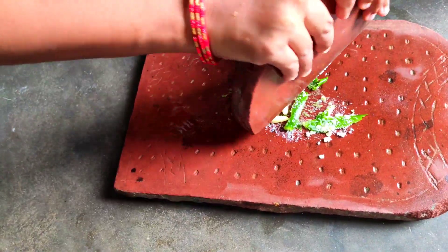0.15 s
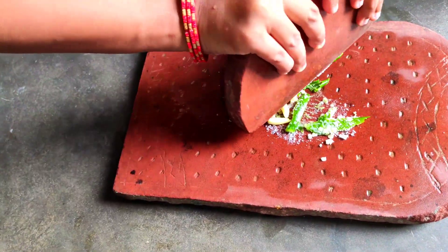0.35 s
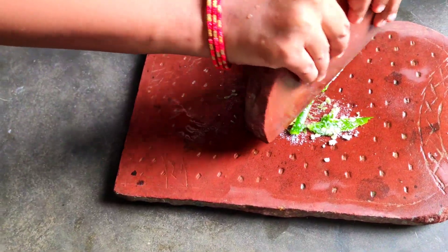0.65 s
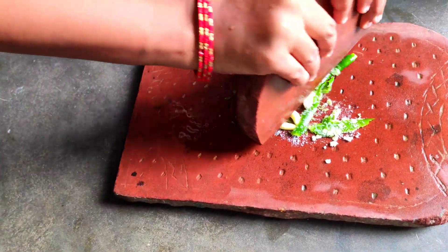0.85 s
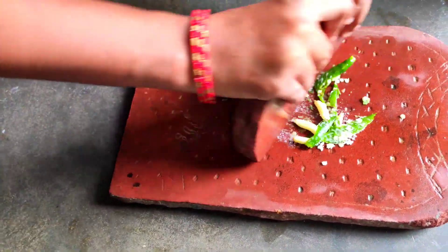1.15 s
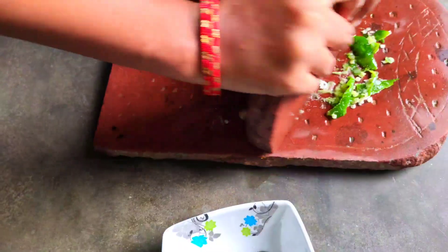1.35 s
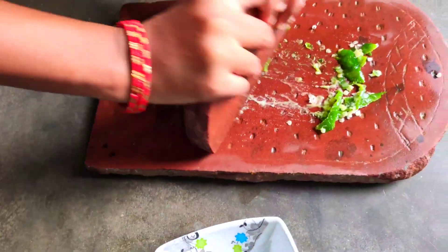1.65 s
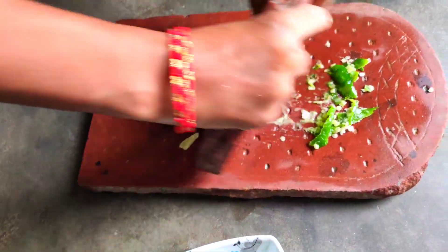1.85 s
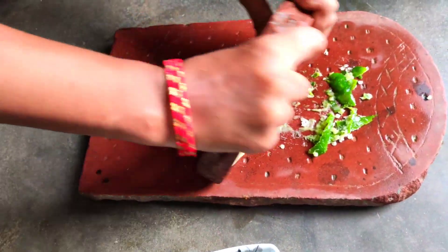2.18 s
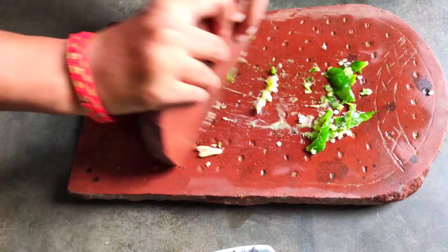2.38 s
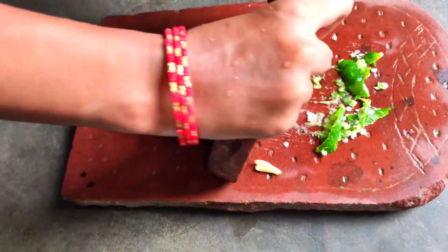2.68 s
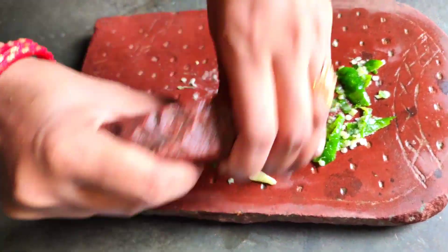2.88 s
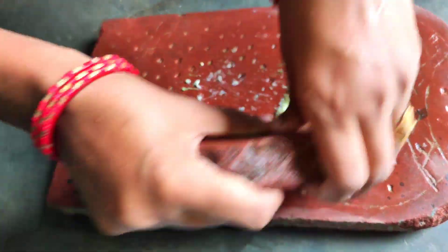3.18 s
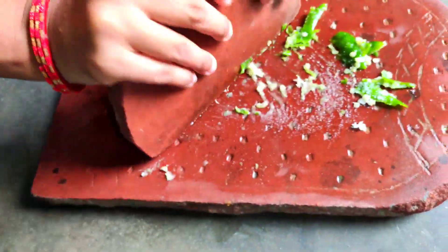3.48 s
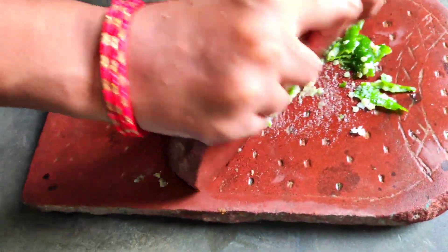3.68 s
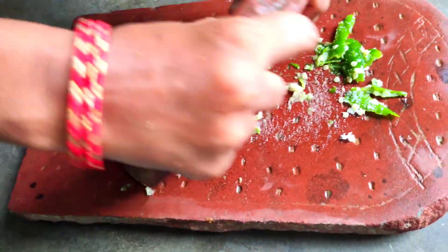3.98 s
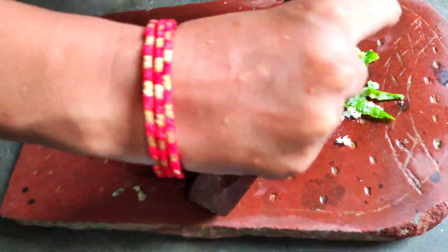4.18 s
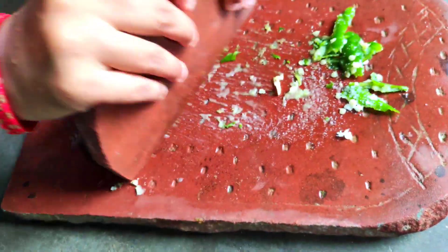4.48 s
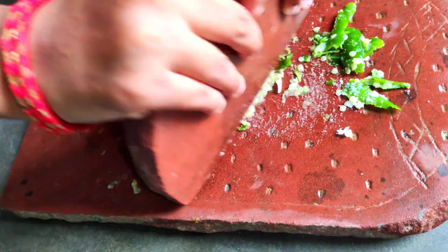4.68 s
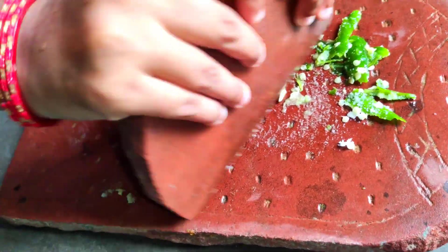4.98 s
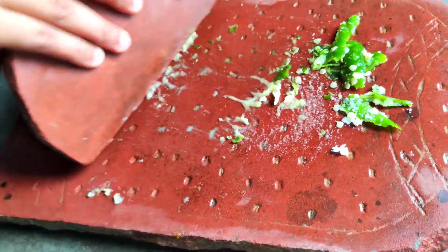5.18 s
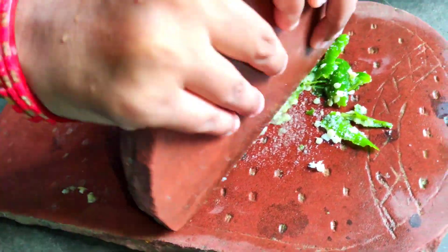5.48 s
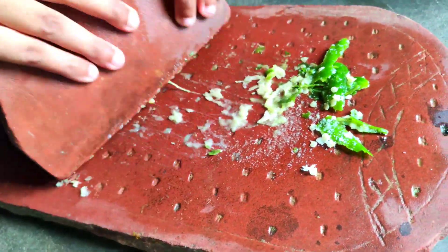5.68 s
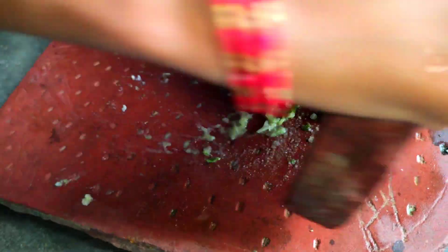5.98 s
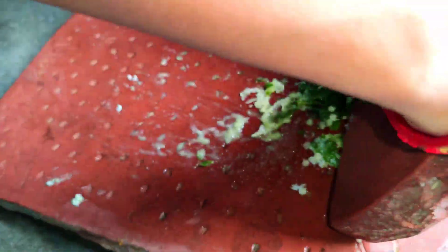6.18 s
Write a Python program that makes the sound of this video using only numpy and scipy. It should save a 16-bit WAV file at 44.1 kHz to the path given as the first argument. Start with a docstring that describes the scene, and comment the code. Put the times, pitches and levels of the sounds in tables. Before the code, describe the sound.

In a quiet, hard-walled kitchen, chillies crackle and crunch under a first gentle press. Then a stone muller rasps over a pitted slab in short, uneven strokes, with fine grit sizzling and salt hissing. Loud stone knocks break in as it lands. Later a thin bangle tinkles now and then and a faint whistle glides far away. The microphone is very close, and the hardest blows distort.

```python
"""Quiet kitchen air is joined by chillies crackling under a first press, then crunching, most often at first.
A stone muller scrapes a slab: grits excite the modes of both stones, fine grit sizzles and salt hisses.
From early on, landings knock both stones, each a sum of decaying modes and short noise bursts.
Later a bangle tinkles now and then, its high modes set off by chatter, and a faint far whistle glides.
Hard walls reverberate the work; a close phone clips whatever exceeds full scale and cuts the top."""
import sys
import numpy as np
from scipy import signal
from scipy.fft import rfft, irfft
from scipy.io import wavfile
from scipy.ndimage import uniform_filter1d

SR = 44100
rng = np.random.default_rng(int(sys.argv[2]) if len(sys.argv) > 2 else 0)


def materialize(psi):
    """Save the field psi as 16-bit PCM at rate SR to the path in sys.argv[1].

    A 1-D psi becomes a single channel; in a 2-D psi each row is a channel.
    """
    bounded = np.clip(np.atleast_2d(psi).T, -1, 1)
    quanta = np.round(bounded * 32767).astype(np.int16)
    wavfile.write(sys.argv[1], SR, quanta)


N = 279594
TIME = np.arange(N) / SR


def undb(db):
    """Logarithmic level: decibels become an amplitude gain."""
    return 10 ** (np.asarray(db) / 20)


def unit(x):
    """Power normalisation: scale to rms 1."""
    return x / np.sqrt(np.mean(x ** 2))


def unit_onset(x):
    """Onset normalisation: scale to rms 1 over the first hundredth of a second."""
    return x / np.sqrt(np.mean(x[:, :SR // 100] ** 2))


def sides(pan_db):
    """Interaural level difference: left and right gains, given left minus right in dB."""
    return undb(np.array([[.5], [-.5]]) * pan_db)


def add(out, start_s, sound):
    """Superposition: mix a stereo sound in at its start time."""
    start = int(start_s * SR)
    out[:, start:start + sound.shape[1]] += sound[:, :N - start]


def convolve(x, response):
    """Linear time-invariant system: pass a sound through an impulse response."""
    return signal.oaconvolve(x, np.atleast_2d(response), axes=1)[:, :x.shape[1]]


def colour(x, points, size=2048):
    """Minimum-phase filtering: a (Hz, dB) outline whose peaks ring after each click."""
    hz, db = np.transpose(points)
    bins_hz = np.arange(size // 2 + 1) * SR / size
    outline_db = np.interp(np.log(bins_hz + 1), np.log(hz), db)
    # folding the cepstrum onto positive times makes the filter causal
    cepstrum = irfft(np.log(undb(outline_db)))
    cepstrum[1:size // 2] *= 2
    cepstrum[size // 2 + 1:] = 0
    return convolve(x, irfft(np.exp(rfft(cepstrum))))


def ring(modes, t, detune=0.):
    """Modal superposition: decaying sines of alternating sign, each randomly shifted by a small ratio."""
    t = np.maximum(t, 0)
    shifts = 1 + detune * rng.standard_normal(len(modes))
    total = 0
    for k, (hz, db, t60) in enumerate(modes):
        decay = undb(db - 60 * t / t60)
        total = total + (-1) ** k * decay * np.sin(2 * np.pi * hz * shifts[k] * t)
    return total


def grits(per_s, spread_db, shared, lag_samples=3):
    """Shot noise: random catches, mostly small; a share is common to both sides, later on the left."""
    shape = (3, N)
    sizes = undb(spread_db * np.minimum(rng.exponential(size=shape), 4))
    catches = rng.random(shape) < per_s / SR
    both, left, right = catches * sizes * rng.choice([-1, 1], shape)
    common = np.array([np.roll(both, lag_samples), both])
    return np.sqrt(shared) * common + np.sqrt(1 - shared) * np.array([left, right])


def burst(points, decay_s, channels=2, rise_s=0.0019):
    """Transient noise: a coloured puff that swells and dies at once, of unit onset."""
    t = np.arange(SR // 10) / SR
    shape = (1 - np.exp(-t / rise_s)) * np.exp(-t / decay_s)
    return unit_onset(colour(rng.standard_normal((channels, len(t))) * shape, points))


def arch(start_s, rise_s, fall_s):
    """Harmonic motion from rest to rest: a quarter sine up to 1 and another down to 0."""
    turn = np.interp(TIME, [start_s, start_s + rise_s, start_s + rise_s + fall_s], [0, 1, 0])
    return np.sin(np.pi / 2 * turn)


def nearness(hz, centre_hz, octaves=0.46):
    """Selective excitation: 1 for a mode at the centre, falling to 0 away from it."""
    return np.exp(-(np.log2(hz / centre_hz) / octaves) ** 2)


# outline of the quiet air: (frequency [Hz], relative level [dB])
AIR = [(20, 2), (60, 3), (120, -4.5), (300, -0.5), (900, -4), (2000, -4), (4000, -9), (7000, -16),
       (13000, -20), (16000, -31)]


def air(level_db=-60.5):
    """Spatial coherence: background noise of the room, alike on both sides in the bass."""
    mid, side = rng.standard_normal((2, 1, N))
    side = colour(side, [(100, -17), (600, -5.0), (1500, 0.0)])
    return undb(level_db) * unit(colour(mid + np.array([[1], [-1]]) * side, AIR))


# first press on the chillies: (start [s], building [s], fading [s])
PRESS = (0.038, 0.25, 0.4)
# cracking chillies and salt crystals: (time [s], onset level before panning [dB])
CRUNCH_EVENTS = [(0.0921, -33), (0.1531, -52), (0.1648, -48), (0.1822, -45), (0.205, -45), (0.2316, -46),
                 (0.2579, -37), (0.3648, -49), (0.413, -48), (0.5142, -50.5), (0.9837, -40), (1.242, -37),
                 (2.4548, -40), (5.2719, -36.5), (5.875, -52.5)]
# outline of one crack: (frequency [Hz], relative level [dB])
CRUNCH_COLOUR = [(500, -21.5), (2500, -11), (4200, -2), (5300, 9), (6500, -0.5), (8000, -13),
                 (15000, -23.5)]


def crunches(pan_db=4, crackle_per_s=140, crackle_db=-53.5):
    """Brittle fracture: quickly dying noise bursts; small ones crackle under the first press."""
    crackle = unit(colour(grits(crackle_per_s, 2.5, 0.78), CRUNCH_COLOUR))
    out = undb(crackle_db) * arch(*PRESS) * crackle
    for start_s, db in CRUNCH_EVENTS:
        add(out, start_s, undb(db) * burst(CRUNCH_COLOUR, 0.0031, rise_s=0.00039))
    return sides(pan_db) * out


# reverberation of the kitchen: (frequency [Hz], decay by 60 dB [s])
ROOM_T60 = [(150, .5), (400, 0.45), (1000, 0.336), (2800, 0.3), (7000, 0.2237), (14000, 0.2)]
# its standing waves: (frequency [Hz], relative level [dB], decay by 60 dB [s])
ROOM_MODES = [(150, -3.5, 0.69), (184, -1, 0.7), (269.3, 2, 0.3), (342.9, -1.7, 0.7)]


def kitchen(x, wet_db=-6.0, early_db=-12, early_s=0.0045, standing_db=-56):
    """Reverberation: hard walls give clustered first echoes, a diffuse tail and low standing waves."""
    t = np.arange(SR // 2) / SR
    hz, t60 = np.transpose(ROOM_T60)
    bins_hz = np.arange(len(t) // 2 + 1) * SR / len(t) + 1
    mid, side = rfft(rng.standard_normal((2, len(t))))
    alike = np.sinc(bins_hz / 1500)  # the two microphones hear long waves alike
    field = np.sqrt((1 + alike) / 2) * mid + np.array([[1], [-1]]) * np.sqrt((1 - alike) / 2) * side
    # overlapping bands of noise, each with its own decay
    tail = 0
    for band, decay_s in zip(np.eye(len(hz)), t60):
        weight = np.interp(np.log(bins_hz), np.log(hz), band)
        tail = tail + irfft(field * weight, len(t)) * undb(-60 * t / decay_s)
    diffuse = undb(wet_db) * np.clip(t / 0.0025, 0, 1) / np.sqrt(0.034 * SR)
    cluster = (t > early_s) * np.exp(-np.abs(t - early_s) / 0.0033)
    early = undb(early_db) * cluster / np.sqrt(0.06 * SR)
    walls = colour(tail * (diffuse + early), [(300, 3.0), (4000, 2), (7000, 1), (14000, -7.5)])
    return convolve(x, walls + undb(standing_db) * ring(ROOM_MODES, t))


# strokes of the muller, nominal levels at full speed: (start [s], speeding up [s], slowing down [s],
# slab rumble [dB], rumble centre [Hz], muller rasp [dB], grit sizzle [dB], salt hiss [dB])
STROKES = [(0.093, 0.0083, 0.16, -54, 543, -63, -55, -63), (0.2, 0.072, 0.085, -56.5, 910, -54, -50, -48),
           (0.31, 0.062, 0.32, -63, 803, -68.5, -67, -59.5),
           (0.65, 0.071, 0.037, -54.5, 920, -52.5, -40.5, -51.5),
           (0.816, 0.045, 0.14, -30, 1250, -37, -37.5, -42.5), (0.96, .09, .06, -65, 880, -65, -57, -58),
           (1.055, 0.076, 0.078, -32, 880, -32.5, -37, -47.5),
           (1.224, 0.035, 0.14, -32, 890, -36, -37.5, -47),
           (1.383, 0.1, 0.098, -39, 740, -42.5, -44.5, -53.5),
           (1.59, 0.074, 0.11, -32.5, 970, -37.5, -38, -51.5),
           (2.0, 0.12, 0.086, -28.5, 1040, -35.5, -35, -47),
           (2.261, 0.095, 0.085, -36.5, 795, -40, -39.5, -47.5),
           (2.435, 0.09, 0.098, -32, 847, -35.5, -37.5, -48),
           (3.09, 0.082, 0.14, -37, 900, -41, -47, -54.5), (3.15, 0.14, 0.35, -51.5, 700, -55, -48, -54),
           (3.453, .1, 0.08, -33, 910, -37.5, -39, -47.5), (3.655, 0.076, .1, -36.5, 790, -37, -38.5, -48),
           (3.843, 0.034, 0.075, -31, 830, -39, -43.5, -54),
           (3.92, 0.063, 0.033, -40.5, 855, -41, -46.5, -59),
           (4.17, .095, 0.13, -37, 740, -37.5, -40.5, -51.5),
           (4.41, 0.11, 0.1, -33.5, 950, -35, -39.5, -51.5),
           (4.63, 0.085, 0.11, -42, 780, -41.5, -44, -52.5),
           (4.828, 0.065, 0.12, -36.5, 980, -38.5, -41, -48.5), (4.96, .04, 0.065, -75, 700, -62, -60, -76),
           (5.22, 0.11, 0.11, -33.5, 870, -34, -38, -47), (5.39, 0.16, 0.043, -64, 706, -57, -52, -54.5),
           (5.496, 0.07, 0.088, -42.5, 756, -42, -41, -49.5),
           (5.666, 0.042, 0.086, -32.5, 1060, -35.5, -37.5, -49),
           (5.75, 0.033, 0.07, -73, 810, -61, -60, -63), (6.17, 0.13, 0.056, -36, 690, -37.5, -41.5, -53)]
# powers of the speed by which layers grow and fade: (rumble [1], rasp [1], sizzle [1], hiss [1])
RISE_POWERS = (1.3, 1.399, 1.5, 1.6)
FALL_POWERS = (2.4, 1.8, 2.77, 2.07)
# the hand bears down early, the salt is swept along later: delays (rumble [s], rasp [s], sizzle [s], hiss [s])
LAYER_DELAYS_S = (.002, .003, .004, .006)


def stroke_controls():
    """Velocity-dependent friction: layer gains are powers of speed; the rumble centre glides by stroke."""
    gains = np.zeros((len(RISE_POWERS), N))
    for start_s, rise_s, fall_s, rumble_db, _, rasp_db, sizzle_db, hiss_db in STROKES:
        speed = arch(start_s, rise_s, fall_s)
        moving = np.flatnonzero(speed)
        rising = TIME[moving] < start_s + rise_s
        levels_db = (rumble_db, rasp_db, sizzle_db, hiss_db)
        for gain, db, up, down in zip(gains, levels_db, RISE_POWERS, FALL_POWERS):
            stroke_gain = undb(db) * speed[moving] ** np.where(rising, up, down)
            gain[moving] = np.hypot(gain[moving], stroke_gain)  # overlapping strokes add in power
    delayed = [np.interp(TIME - delay_s, TIME, gain) for gain, delay_s in zip(gains, LAYER_DELAYS_S)]
    start_s, rise_s, _, _, centre_hz, *_ = np.transpose(STROKES)
    return delayed, np.interp(TIME, start_s + rise_s, centre_hz)


def sway(x, modes, steady_db, sway_db=8.5, rate_hz=12, sharpness=9):
    """Moving contact: each resonance is driven now more, now less, around its curve in steady_db."""
    out = x
    knots_s = np.arange(0, N / SR + 1, 1 / rate_hz)
    for (hz, _, _), steady in zip(modes, steady_db):
        band = signal.lfilter(*signal.iirpeak(hz, sharpness, fs=SR), x)
        wander_db = sway_db * rng.standard_normal(len(knots_s)).clip(-2, 1.5)
        db = wander_db + np.interp(knots_s, TIME, steady + np.zeros(N))
        out = out + (np.interp(TIME, knots_s, undb(db)) - 1) * band
    # the colour shifts while the strength stays
    return out / np.sqrt(uniform_filter1d(np.mean(out ** 2, axis=0), SR // 16) + 1e-12)


def slips(per_s=55, lift=0.71, slip_s=.004):
    """Stick-slip: the gain jumps as the muller snags on pits and jumps free, then decays; rms 1."""
    snags = (rng.random(N) < per_s / SR) * rng.uniform(0.85, 0.89, N)
    return unit(1 + lift * signal.lfilter([1], [1, -np.exp(-1 / (slip_s * SR))], snags))


# modes of slab, muller and their stiff contact: (frequency [Hz], relative level [dB], decay by 60 dB [s])
SLAB = [(331.5, -15, 0.019), (505, -6, 0.017), (682, -3.5, 0.025), (863, -1.5, 0.019), (956, -1.5, 0.024),
        (1120, -0.5, 0.011), (1292, -6.5, 0.009), (1230, -5.5, 0.0026)]
MULLER = [(1380, -2.5, 0.0092), (1784.6, -2.5, 0.023), (1927, 0.5, 0.011), (2113, -8.5, 0.022)]
CLACK = [(2454, 0, 0.024), (2624, 0, 0.016), (2830, -2.5, 0.029), (3390, -20.5, 0.029)]
# outlines of coarse rumble, rasp, fine-grit sizzle and salt hiss: (frequency [Hz], relative level [dB])
RUMBLE = [(50, -53), (150, -23.5), (280, -16.5), (400, -9), (580, -2.5), (740, -6), (920, -10), (1110, -3),
          (1320, -10.5), (1550, -11.5), (2000, -15.5), (3500, -52.5)]
RASP = [(900, -23), (1550, -12), (1870, 2.5), (2230, -2), (2680, 4), (3000, -2), (3400, -3.5),
        (4500, -46.5)]
SIZZLE = [(2400, -29), (3400, 0.5), (4050, 5.5), (4700, -1.5), (5500, 1.5), (6300, -1.5), (7400, -38),
          (10000, -47)]
HISS = [(4000, -41.5), (6500, 6), (7700, -1.5), (9400, -1.5), (11000, -9), (13000, -12), (16000, -21)]
# where the muller rubs: (time [s], left minus right [dB])
PLACE = [(0, 8), (1.1, 6.5), (2.6, 5), (3.4, 2.5), (4.4, 2), (5.3, 2), (5.7, 2.5), (6.3, 1)]
# tilt of the muller on its edge: (time [s], drive of the contact modes over the muller modes in the rasp [dB])
EDGE = [(0.1, -3), (0.9, 12), (1.3, 3.5), (2.1, 1.5), (3.6, -5.5), (4.5, -3), (5.3, -3), (6.3, 3)]


def scraping(focus_db=11, focus_db_per_octave=9, rumble_pan_db=-0.2, sizzle_further_db=2, hiss_pan_db=-2):
    """Friction-driven resonance: grits shake both stones; the hand's judder modulates all together."""
    (rumble_gain, rasp_gain, sizzle_gain, hiss_gain), centre_hz = stroke_controls()
    place = sides(np.interp(TIME, *np.transpose(PLACE)))
    judder_filter = signal.butter(2, 110, fs=SR, output="sos")
    judder = unit(signal.sosfilt(judder_filter, rng.standard_normal(N)))
    # slab modes nearest the rumble's centre are driven hardest, the more so the higher it lies
    focus = focus_db + focus_db_per_octave * np.log2(centre_hz / np.mean(centre_hz))
    near_centre_db = [focus * nearness(hz, centre_hz) - 3.5 for hz, _, _ in SLAB]
    edge_db = np.interp(TIME, *np.transpose(EDGE))
    leaning_db = [-edge_db / 2] * len(MULLER) + [edge_db / 2] * len(CLACK)
    coarse = colour(grits(1000, 2.3, 0.85), RUMBLE)
    rumble = sway(coarse, SLAB, near_centre_db, sway_db=5.5) * rumble_gain
    rasp = sway(colour(grits(1800, 1.8, 0.11), RASP), MULLER + CLACK, leaning_db) * rasp_gain
    sizzle = unit(colour(grits(2500, 1.9, 0.61), SIZZLE)) * sizzle_gain
    hiss = unit(colour(grits(2300, 1.7, 0.076), HISS)) * hiss_gain
    # rasp follows the muller's place, sizzle lies further left
    rub = sides(rumble_pan_db) * rumble + sides(hiss_pan_db) * hiss
    rub = rub + place * (rasp + sides(sizzle_further_db) * sizzle)
    return undb(0.77 * judder) * slips() * rub


def knock(modes, rise_s, right_lead_s, rattle=.5):
    """Impact excitation: modes swell as rough faces seat in many tiny contacts; unit onset."""
    t = np.arange(SR // 10) / SR
    swell = 1 - np.exp(-(t / rise_s) ** 2)
    clean = ring(modes, t + np.array([[0], [right_lead_s]]), detune=0.0067) * swell
    contacts = rng.standard_normal((2, len(t))) * np.exp(-t / 0.001)
    return unit_onset(unit(clean) + rattle * unit(convolve(clean, contacts)))


# landings and catches of the muller, onset levels before panning: (time [s], floor thump [dB],
# slab thud [dB], thud centre [Hz], muller note [dB], clack [dB], spit of grit [dB], left minus right [dB])
KNOCKS = [(0.121, -59.5, -52, 490, -68, -66, -64, 1), (0.298, -62, -39.5, 1010, -57, -62, -67, 1),
          (0.7, -45, -15.5, 1090, -18.5, -20.5, -31.5, 3.5), (0.843, -79, -31, 1140, -46, -42, -47, 1),
          (1.0736, -49.5, -24.5, 900, -35, -31.5, -39.5, -2.5),
          (1.243, -72, -55, 1000, -51, -31.5, -43, -2), (1.6378, -59.5, -33, 1160, -59, -47, -48.5, 9),
          (1.929, -47, -16.5, 1120, -9.5, -16.5, -18.5, 2), (2.035, -58, -45, 950, -31, -35, -45, 9),
          (2.074, -72, -32.5, 1090, -31, -53, -49, 8), (2.9056, -37.5, -13, 1330, -22, -27.5, -36, -2.1),
          (3.048, -39.5, -11.5, 1100, -19.5, -21.5, -29, 0), (3.689, -77.5, -37, 750, -42, -46, -47, -3),
          (4.0991, -45, -14, 1070, -15, -15.5, -30.5, -2), (4.445, -59, -38, 1010, -39, -60, -59, -4),
          (5.1712, -38.5, -19.5, 560, -14.5, -10.5, -15, 4.5), (5.523, -62, -25, 740, -34, -57, -42, -2),
          (5.5443, -48, -22.5, 750, -29.5, -48.5, -36, 2.5), (6.081, -49, -22, 1200, -17, -21, -44, 2.5)]
# outlines of floor thump, crack of rough faces and crushed grit: (frequency [Hz], relative level [dB])
THUMP = [(25, -16.5), (70, -11), (150, -2.5), (250, 2), (400, -1), (900, -46.5)]
CRACK = [(200, -17), (450, -20.5), (800, 14), (1300, -2.5), (1600, 4), (2200, -5), (2900, -38.5),
         (4500, -46)]
SPIT = [(300, -5), (1400, 4), (3500, 12.5), (4900, 3.5), (6200, -1.5), (8000, -22), (15000, -50.5)]


def knocks(crack_db=-9.5, focus_db=5, thud_pan_share=0.56):
    """Collision of solids: floor thump, slab thud with rough crack, muller note, clack and grit spit."""
    out = np.zeros((2, N))
    for start_s, thump_db, thud_db, centre_hz, note_db, clack_db, spit_db, pan_db in KNOCKS:
        # where the muller lands decides which slab modes are driven hardest
        struck = [(hz, db + focus_db * nearness(hz, centre_hz), t60) for hz, db, t60 in SLAB]
        thump = undb(thump_db) * burst(THUMP, 0.017, channels=1)
        thud = undb(thud_db) * knock(struck, 0.00085, 0.0001, rattle=0.65)
        crack = undb(thud_db + crack_db) * burst(CRACK, 0.0012, channels=1)
        note = undb(note_db) * knock(MULLER, 0.0016, 0.00016, rattle=0.78)
        clack = undb(clack_db) * knock(CLACK, 0.00037, .0001, rattle=1.0)
        spit = undb(spit_db) * burst(SPIT, 0.004)
        # the broad slab is heard less to one side than the point of contact
        broad = sides(thud_pan_share * pan_db) * (thump + thud + crack)
        add(out, start_s, broad + sides(pan_db) * (note + clack + spit))
    return out


# jogs of a thin bangle: (time [s], peak level before panning, without the tick [dB])
TINKLES = [(2.5631, -30.5), (3.9404, -47.5), (3.9886, -36.5), (4.518, -32.5), (4.9816, -35.5),
           (5.418, -34.5), (5.4445, -39), (5.873, -34.5)]
# modes of the bangle: (frequency [Hz], relative level [dB], decay by 60 dB [s])
BANGLE = [(9180, -1, .11), (9530, 5, 0.05), (10000, 0, 0.04), (14750, -3, .06), (15350, -5, 0.05)]


def bangle(tick_db=-18):
    """Modal ringing of thin metal: brief chatter against itself excites very high modes."""
    out, t = np.zeros((2, N)), np.arange(SR // 4) / SR
    tick_colour = [(2000, -31), (5500, 9.5), (10000, -0.5), (16000, -2.5)]  # (Hz, dB)
    for start_s, db in TINKLES:
        chatter = rng.laplace(size=(2, len(t))) * np.exp(-t / 0.0017)
        tinkle = convolve(chatter, ring(BANGLE, t, detune=0.0035))
        add(out, start_s, undb(db) * sides(-1) * tinkle / np.abs(tinkle).max())
        add(out, start_s, undb(db + tick_db) * burst(tick_colour, 0.0034))
    return out


# a faint far whistle, before waver and flicker: (start [s], swelling [s], fading [s],
# starting pitch [Hz], glide [Hz/s], peak level [dB])
WHISTLES = [(3.9, .15, .5, 1940, -150, -52), (4.9, 0.16, .22, 1863, 203.5, -53),
            (5.749, 0.37, .08, 2380, -800, -59)]


def whistle(waver_share=0.015, flicker_db=3):
    """Frequency and amplitude modulation: a gliding sine wavers and flickers apart on each side."""
    slow = signal.butter(2, 70, fs=SR, output="sos")
    waver, flicker = unit(signal.sosfilt(slow, rng.standard_normal((2, 2, N))))
    out = np.zeros((2, N))
    for start_s, rise_s, fall_s, hz, glide, db in WHISTLES:
        pitch = (hz + glide * (TIME - start_s)) * (1 + waver_share * waver)
        tone = np.sin(2 * np.pi * np.cumsum(pitch, axis=1) / SR)
        out += undb(db) * arch(start_s, rise_s, fall_s) * tone
    return out * undb(flicker_db * flicker)


def scene():
    """Direct and reverberant fields: work on the slab, heard close and through the kitchen."""
    background = air()
    work = crunches() + scraping() + bangle()
    blows = knocks()
    return background + blows + work + kitchen(blows + undb(-0.5) * work) + whistle()


def record(dry, top_hz=15900):
    """Overload and band limiting: the phone clips at full scale, then a steep filter cuts the top."""
    clipped = np.clip(dry, -1, 1)
    return signal.sosfilt(signal.ellip(8, .2, 70, top_hz, fs=SR, output="sos"), clipped)


dry = scene()
out = record(dry)
materialize(out)
```